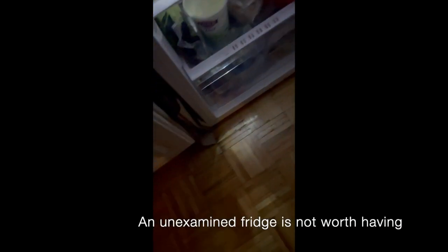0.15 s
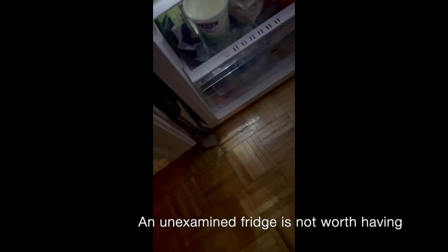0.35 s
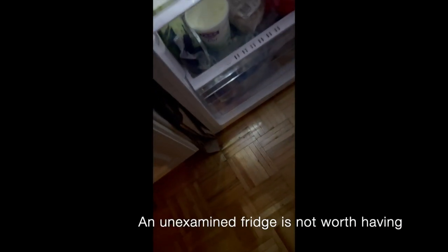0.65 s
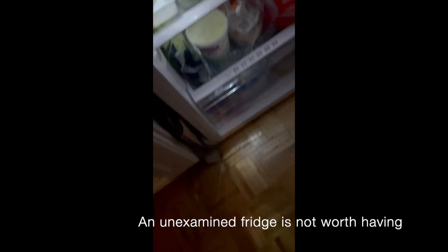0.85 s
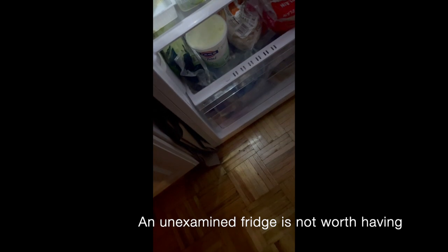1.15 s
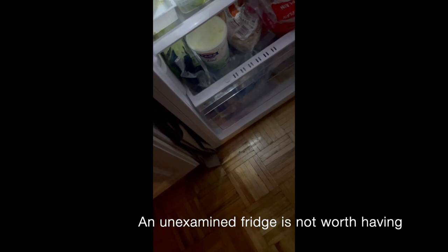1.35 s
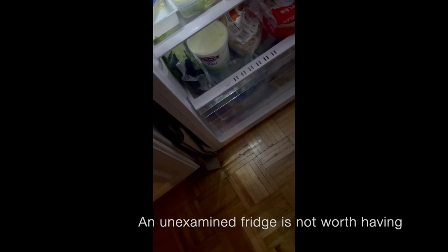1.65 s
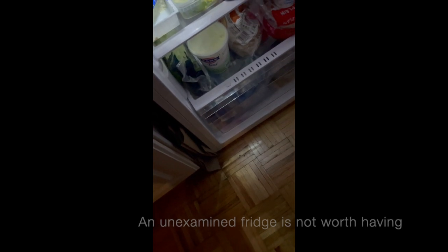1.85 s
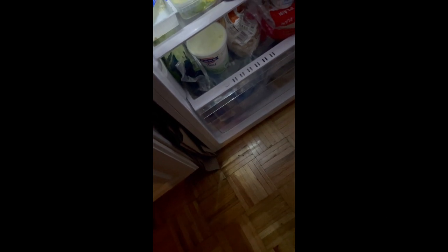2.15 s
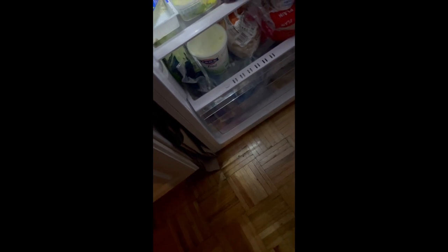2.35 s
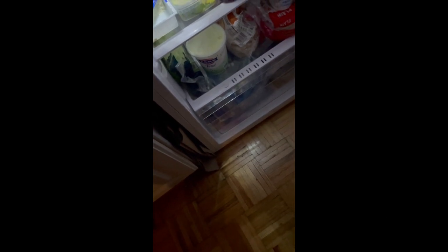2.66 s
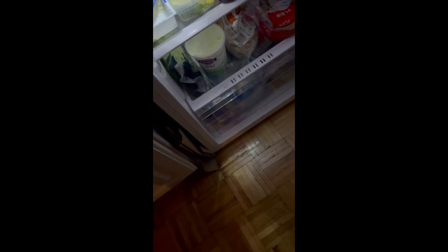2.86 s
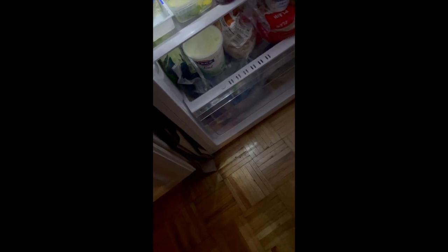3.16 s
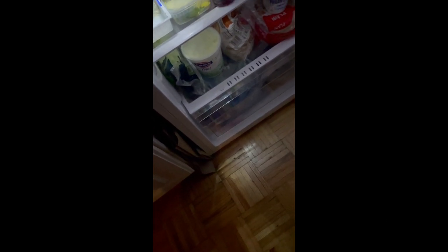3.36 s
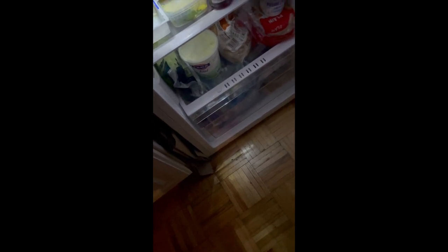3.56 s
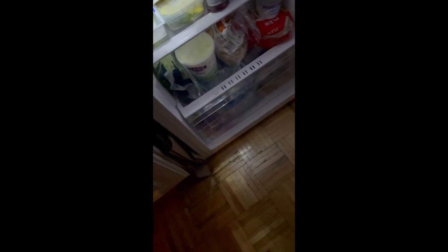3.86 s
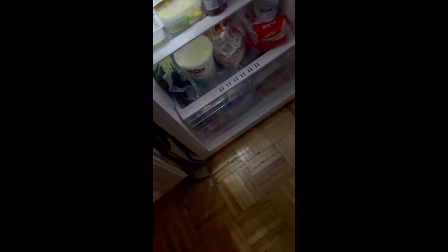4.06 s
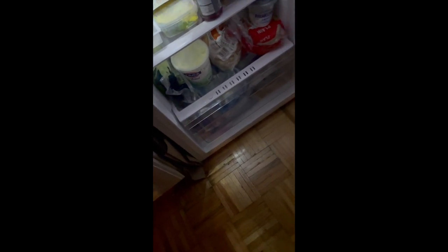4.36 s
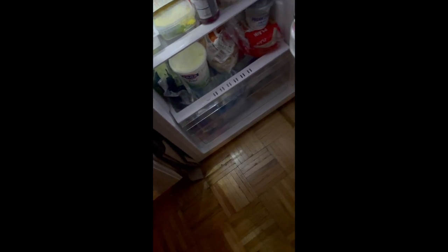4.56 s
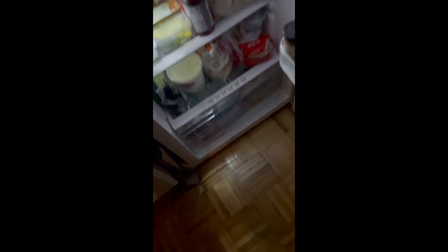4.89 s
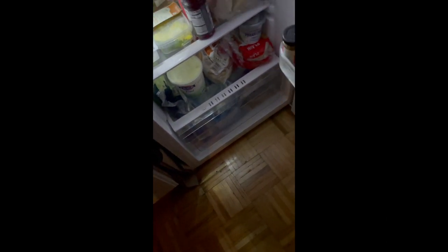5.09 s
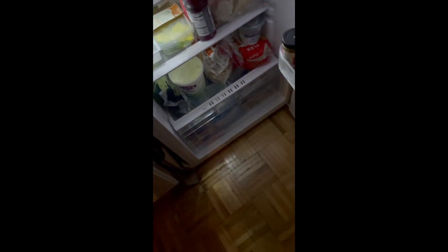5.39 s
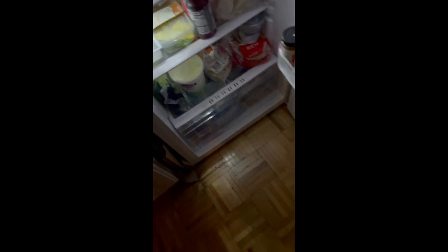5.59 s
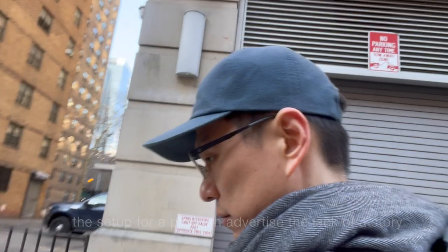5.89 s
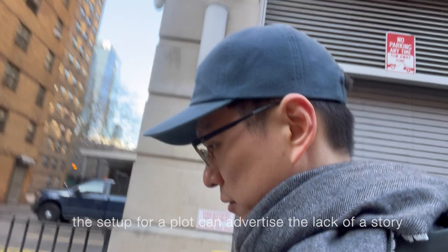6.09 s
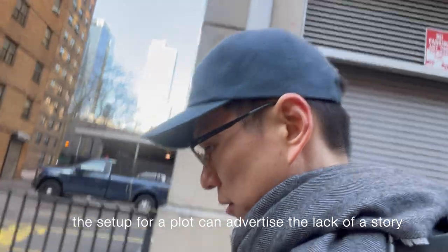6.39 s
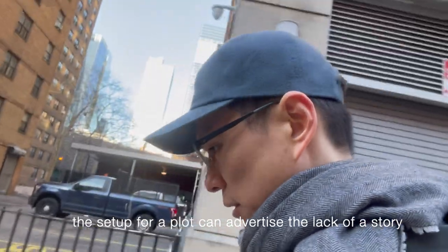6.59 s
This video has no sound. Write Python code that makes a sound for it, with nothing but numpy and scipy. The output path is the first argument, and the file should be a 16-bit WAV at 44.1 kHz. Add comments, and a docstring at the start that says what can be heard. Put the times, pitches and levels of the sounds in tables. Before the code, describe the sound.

A refrigerator runs in a quiet kitchen, heard from a hand-held microphone. From the start there is a steady low hum with a fluttering, higher buzz, a soft rush of air and a very faint hiss of gas in the pipes. Fingers rustle and rumble softly on the microphone in the first half second. The plastic liner ticks lightly now and then, most clearly at about 1.3 seconds. A soft, low knock comes at about 4.2 seconds, and the buzz shifts slightly in tone as the microphone moves. Two sharp taps hit the microphone at about 5.6 and 5.8 seconds. At about 5.9 seconds the sound cuts abruptly to a much louder street. Traffic roars widely, wind gusts buffet the microphone and ease off, clothing rustles faintly, and small metal pieces clink brightly close by until the end at about 6.5 seconds.

```python
"""A refrigerator hums and buzzes with its door open in a quiet kitchen. Its compressor shaft makes the hum,
and each piston stroke shakes the shell into a buzz. Cooling gas hisses in the pipes, the plastic liner
ticks, and a hand rustles and taps on the microphone. Near the end the scene cuts to a city pavement:
loud traffic, wind buffeting the microphone and small metal things clinking on someone walking."""
import sys
import numpy as np
from scipy import signal
from scipy.fft import rfft, irfft
from scipy.io import wavfile
from scipy.ndimage import uniform_filter1d

SR = 44100
rng = np.random.default_rng(int(sys.argv[2]) if len(sys.argv) > 2 else 0)


def materialize(psi):
    """Save the field psi as 16-bit PCM at rate SR to the path in sys.argv[1].

    A 1-D psi becomes a single channel; in a 2-D psi each row is a channel.
    """
    bounded = np.clip(np.atleast_2d(psi).T, -1, 1)
    quanta = np.round(bounded * 32767).astype(np.int16)
    wavfile.write(sys.argv[1], SR, quanta)


N = 296969
TIME = np.arange(N) / SR
FREQ = np.maximum(np.arange(N // 2 + 1) * SR / N, 1)
SHAFT_HZ = 59.4094  # turns of the compressor each second
CUT_S = 5.856  # the kitchen gives way to the street


def undb(db):
    """Turn decibels into a gain."""
    return 10 ** (np.asarray(db) / 20)


def unit(x):
    """Scale a sound to an average (rms) level of 1."""
    return x / np.sqrt(np.mean(x ** 2))


def shape(points):
    """A gain for every frequency, drawn through (pitch_hz, level_db) points."""
    hz, db = np.transpose(points)
    return undb(np.interp(np.log(FREQ), np.log(np.maximum(hz, 1)), db))


def drift(rate_hz):
    """A smooth random wobble, about 1 in size."""
    hold = int(SR / rate_hz)
    steps = np.repeat(rng.standard_normal(N // hold + 1), hold)
    return 1.3 * uniform_filter1d(uniform_filter1d(steps, hold), hold)[:N]


def swell(middle_s, half_length_s, db):
    """A bell-shaped rise and fall in level."""
    return undb(db) * np.exp(-((TIME - middle_s) / half_length_s) ** 2)


def noise(gain):
    """Noise with the given tone colour, at level 1."""
    return unit(irfft(rfft(rng.standard_normal(N)) * gain, N))


def stereo_noise(gain, side_gain, lag_ms=0, direct=0):
    """Mid is what both ears share, side is how they differ; the direct share arrives on the left first."""
    mid, diffuse = rfft(rng.standard_normal((2, N))) * gain
    lead = direct * np.sin(2 * np.pi * FREQ * lag_ms / 1000)
    side = irfft(side_gain * (1j * lead * mid + np.sqrt(1 - lead ** 2) * diffuse), N)
    mid = irfft(mid, N)
    return np.array([mid + side, mid - side]) / mid.std()


def pan(db):
    """Two gains that make the left louder than the right by db."""
    return undb(np.array([[db], [-db]]) / 2)


def add(out, start_s, sound):
    """Mix a short stereo sound into out."""
    i = int(start_s * SR)
    out[:, i:i + sound.shape[-1]] += sound[..., :N - i]


def strike(modes, tilt_db, contact_s):
    """A small hit with peak 1: a rough contact rings an object's notes, each fading 60 dB in ring_s."""
    t = TIME[:SR // 8]
    ring = 0
    for hz, ring_s, db in modes:
        angle = 2 * np.pi * hz * (1 + 0.012 * rng.standard_normal()) * t
        ring = ring + undb(db + tilt_db * np.log2(hz / 3000) - 60 * t / ring_s) * np.sin(angle)
    contact = 0.27 * rng.standard_normal((2, len(t))) * np.exp(-t / contact_s)
    contact[:, 0] += 1
    out = signal.fftconvolve(contact, ring[None], axes=1)
    return out / np.abs(out).max()


def bump(middle_s, db, hz, half_length_s, phase=0):
    """A soft push on the microphone, a few cycles long."""
    return swell(middle_s, half_length_s, db) * np.sin(2 * np.pi * (phase - hz * (TIME - middle_s)))


def echo(x, wet_db, ring_s):
    """Hard walls add a short wash of echoes without the top treble."""
    t = TIME[:SR // 2]
    tail = rng.standard_normal((2, len(t))) * undb(-60 * t / ring_s) * (t > .003)
    tail = signal.sosfilt(signal.butter(2, 7000, fs=SR, output="sos"), tail)
    tail /= np.sqrt(np.sum(tail ** 2, axis=1, keepdims=True))
    return x + undb(wet_db) * signal.fftconvolve(x, tail, axes=1)[:, :N]


def nearest_turn(delay_ms):
    """For an event that comes once a shaft turn: the nearest turn's number, and ms from its event."""
    turns = SHAFT_HZ * (TIME - delay_ms / 1000)
    nearest = np.round(turns)
    return nearest.astype(int) + 1, (turns - nearest) * 1000 / SHAFT_HZ


# Tone colour of the traffic: pitch_hz, relative_db
TRAFFIC_COLOUR = [(18, -44), (30, -15), (46, -0.5), (85, 1), (227, -10), (306, -7), (401, -13), (454, -10),
                  (501, -13), (745, -7), (1160, -16.5), (2500, -23), (5930, -41), (8810, -41),
                  (11000, -48.5), (14300, -78), (22000, -120)]
# How wide the traffic sounds: pitch_hz, side_minus_mid_db
TRAFFIC_WIDTH = [(60, 0), (110, 0.5), (200, 4), (380, 3), (700, 4.5), (1290, 9.5), (2380, -1.5),
                 (4400, 0.5), (8120, -5.5), (15000, 26)]
def traffic(since_cut_s, level_db=-40, fade_db_per_s=1.5):
    """Traffic roars between house fronts and slowly draws away."""
    roar = stereo_noise(shape(TRAFFIC_COLOUR), shape(TRAFFIC_WIDTH), lag_ms=0.3, direct=0.55)
    return roar * undb(level_db - fade_db_per_s * since_cut_s + 0.92 * drift(25))


def clothing():
    """Cloth rustles in small, bright grains."""
    colour = shape([(3000, -30), (6500, -10), (9000, 7.5), (12000, -15), (15000, 2.5)])
    return stereo_noise(colour, undb(-12)) * undb(-66 + 2 * drift(35))


# Tone colour of the breeze: pitch_hz, relative_db
WIND_COLOUR = [(25, -23), (55, -10), (85, -11.5), (135, 3), (190, -7), (250, -7.5), (400, -20.5),
               (800, -18.5), (2000, -71)]
# Gusts that throw swirls of air: start_s, length_s, typical_peak_db, typical_pitch_hz
GUSTS = [(5.864, .12, -27, 145), (5.995, .035, -29.5, 380), (6.191, 0.031, -30.5, 440),
         (6.269, .03, -34, 340), (6.33, .03, -37, 63.6)]
def wind(since_cut_s, level_db=-33.5, fade_db_per_s=19, swirls=5, half_length_cycles=1.15):
    """A dying breeze and its gusts hit one side of the microphone; small swirls are short and high."""
    out = noise(shape(WIND_COLOUR)) * undb(level_db - fade_db_per_s * since_cut_s + 3.9 * drift(40))
    for start_s, length_s, db, hz in GUSTS:
        times = start_s + length_s * (np.arange(swirls) + rng.random(swirls) - .5) / (swirls - 1)
        for middle_s, (pitch, size, phase) in zip(times, rng.standard_normal((swirls, 3))):
            swirl_hz = hz * np.exp(0.17 * pitch)
            out += bump(middle_s, db + 2.5 * size, swirl_hz, half_length_cycles / swirl_hz, phase)
    return out


# Notes of a small piece of metal: pitch_hz, ring_s, relative_db
METAL_NOTES = [(7970, 0.011, -4), (9020, 0.017, -4), (10060, 0.0046, -0.5), (12450, .006, -4),
               (14330, 0.028, -10), (15140, 0.022, -4), (15200, 0.018, -2.5)]
# Each clink: start_s, relative_db
CLINKS = [(5.882, -49), (5.950, -52.5), (6.257, -40), (6.263, -50), (6.306, -49), (6.3752, -52),
          (6.393, -48), (6.466, -45.5)]
def clinks(boost_db=7.5):
    """Small metal, such as a zip pull, knocks and rings on someone walking."""
    out = np.zeros((2, N))
    for start_s, db in CLINKS:
        add(out, start_s, undb(db + boost_db) * strike(METAL_NOTES, 0, contact_s=0.0034))
    return out


def street():
    """Traffic, separate wind on the left and right, and a walker close by."""
    since_cut_s = np.maximum(TIME - CUT_S, 0)
    roar = traffic(since_cut_s)
    buffeting = np.array([wind(since_cut_s), wind(since_cut_s)]) * pan(-0.9)
    return roar + buffeting + clothing() + clinks()


# Tone colour of the kitchen air: pitch_hz, relative_db
AIR_COLOUR = [(20, -27), (45, -5), (75, -0.5), (150, -12), (200, -3), (300, -9.5), (420, -20), (600, -28),
              (1000, -26.5), (1250, -23), (2400, -28), (3200, -44), (6000, -55), (12000, -72)]
# How wide noise sounds in the kitchen: pitch_hz, side_minus_mid_db
ROOM_WIDTH = [(60, -17), (200, -21), (380, -7), (700, 3.5), (1300, -3.5), (4400, 0), (12000, 10)]
def room_air():
    """Air and a fan make a soft, low rush."""
    return undb(-58.5 + drift(5)) * stereo_noise(shape(AIR_COLOUR), shape(ROOM_WIDTH))


# Notes of the microphone's case: pitch_hz, ring_s, relative_db
CASE_NOTES = [(760, 0.021, -1.5), (1140, 0.0088, -13), (1710, .008, 2), (2650, 0.0047, 4.5),
              (3900, .005, -1), (5100, 0.005, -2), (7800, 0.0016, -21), (14800, 0.0018, -3)]
# Each tap: start_s, peak_db, brightness_db_per_octave
TAPS = [(5.6481, -34, -0.5), (5.844, -29, -7)]
def taps():
    """Sharp taps make the microphone's case ring briefly."""
    out = np.zeros((2, N))
    for start_s, db, tilt_db in TAPS:
        add(out, start_s, undb(db) * strike(CASE_NOTES, tilt_db, contact_s=0.00053))
    return out


# Tone colour of rubbing fingers: pitch_hz, relative_db
GRIP_COLOUR = [(20, -11), (50, 6.5), (100, -17.5), (250, -22), (700, -17.5), (2000, -31), (3800, -30.5),
               (8000, -50), (11000, -64.5)]
# Presses of the palm: middle_s, half_length_s, level_db
PRESSES = [(0.222, 0.088, -49.5), (4.28, 0.053, -54)]
# Tone colour of their rumble: pitch_hz, relative_db
PRESS_COLOUR = [(20, -16), (45, 5.5), (65, 7.5), (110, -16), (400, -61.5), (2000, -110)]
def handling(grip_db=-62, fade_db_per_s=20):
    """A hand holds the microphone: fingers rustle and settle, the palm rumbles, the case is knocked."""
    clicks = taps()
    grip = undb(grip_db - fade_db_per_s * TIME + 2 * drift(40))
    rustle = grip * stereo_noise(shape(GRIP_COLOUR), shape(ROOM_WIDTH))
    rumble = sum(swell(*press) for press in PRESSES) * noise(shape(PRESS_COLOUR))
    knock = bump(middle_s=4.158, db=-36, hz=71, half_length_s=0.0085)
    return echo(clicks, wet_db=-9, ring_s=0.25) + rustle + rumble + knock


# Each whistle: middle_s, half_length_s, pitch_hz, level_db
WHISTLES = [(.63, .11, 4560, -88), (5.0, .7, 4620, -93)]
def whistles(half_width_hz=45):
    """Gas whistles thinly in a narrow pipe: a slim band of hiss swells and fades."""
    return sum(swell(middle_s, half_length_s, db) * noise(1 / (1 + ((FREQ - hz) / half_width_hz) ** 4))
               for middle_s, half_length_s, hz, db in WHISTLES)


# Puffs from the valves in one shaft turn: delay_ms, half_length_ms, relative_db
VALVE_PUFFS = [(0, 0.93, 8.5), (2, 1.8, -3), (7.6, 1.4, -2.5), (10.4, .8, -8.5)]
# Pitches at which the pipes ring: pitch_hz, half_width_hz, relative_db
PIPE_NOTES = [(2780, 82, -1.5), (3350, 63, -5.5), (3530, 110, 3), (3900, 74, 3.5), (4570, 220, 0),
              (4840, 170, 2), (5800, 200, -9.5), (7500, 1200, -25.5)]
def gas_hiss(level_db=-85.5, steady_db=-2.5):
    """Cooling gas hisses through the pipes, with a puff each time a valve opens."""
    puffs = sum(undb(db) * np.exp(-(nearest_turn(delay_ms)[1] / half_length_ms) ** 2)
                for delay_ms, half_length_ms, db in VALVE_PUFFS)
    flow = (undb(steady_db) + puffs) * stereo_noise(1, undb(-5.5))
    pipe_power = sum(undb(db) ** 2 / (1 + ((FREQ - hz) / width) ** 2) ** 2
                     for hz, width, db in PIPE_NOTES)
    return undb(level_db) * unit(irfft(rfft(flow) * np.sqrt(pipe_power), N))


# Notes of the plastic liner: pitch_hz, ring_s, relative_db
LINER_NOTES = [(500, .03, -16), (890, 0.062, -7.5), (1500, 0.016, -9), (2970, 0.023, 0), (3310, .018, 2),
               (3820, 0.0051, -2), (4400, 0.0072, -2), (5100, 0.0041, -1.5), (6200, .008, -13.5),
               (8550, .006, -24)]
# Each tick: start_s, relative_db, brightness_db_per_octave
TICKS = [(.489, -71, 1), (.509, -61, -4), (.560, -60, 3), (1.2532, -49.5, -2.5), (2.222, -72, 8),
         (2.835, -71, 3.5), (3.703, -68, 10), (4.294, -65, 5), (4.365, -68.5, 7.5), (4.8305, -67, 2)]
def liner_ticks(boost_db=7.5):
    """The cabinet's plastic liner ticks now and then."""
    out = np.zeros((2, N))
    for start_s, db, tilt_db in TICKS:
        add(out, start_s, undb(db + boost_db) * strike(LINER_NOTES, tilt_db, contact_s=0.003))
    softened = signal.sosfilt(signal.butter(4, 9000, fs=SR, output="sos"), out)
    return echo(softened, wet_db=-8, ring_s=0.17)


# Pitches that the cabinet swallows: pitch_hz, half_width_hz, change_db
CABINET_DIPS = [(1032, 22, -5.5), (1223, 61, -3), (1597, 50, -8.5), (2190, 25, -10), (2763, 90, -6)]
def through_cabinet(x):
    """Reflections inside the cabinet cancel a few narrow bands."""
    dips_db = sum(db * np.exp(-((FREQ - hz) / width) ** 2) for hz, width, db in CABINET_DIPS)
    return irfft(rfft(x) * undb(dips_db), N)


# Ways the pump rocks: rate_hz, timing_swing_ms, strength_swing_db
ROCKING = [(18, .046, 1.2), (10.5, .022, .6), (24, .014, .5)]
def pump_rocking(stroke_count, wander=0.077):
    """The pump rocks on its springs, which changes the timing and strength of each stroke."""
    stroke_s = np.arange(stroke_count) / SHAFT_HZ
    early_ms, strength_db = 0, 0
    for hz, swing_ms, swing_db in ROCKING:
        sway = np.sin(2 * np.pi * hz * stroke_s + wander * np.cumsum(rng.standard_normal(stroke_count)))
        early_ms = early_ms + swing_ms * sway
        strength_db = strength_db + swing_db * sway
    return early_ms, strength_db


# Bursts of the shell in one turn: delay_ms, base_pitch_hz, half_length_ms, base_db, left_minus_right_db
SHELL_BURSTS = [(3.01, 1199, 2.12, -53.5, 5), (7.5, 1212, 1.92, -50.5, -10.5), (10, 1460, 1.65, -62.5, -3),
                (15, 1138, 2.08, -60.5, -7), (3.19, 1837, 1.13, -58, -0.5), (11.15, 1930, 1.8, -70, 2.5),
                (4.7, 2424, 1.78, -61, 10.5), (9.2, 2490, 4.8, -63.5, -4), (0.81, 4950, 1, -78.5, 0),
                (1.1, 4600, 0.79, -81, -2), (1.3, 3920, 1.2, -82.5, -4), (2.6, 3500, 1.5, -79.5, -1.5),
                (12, 2600, 2.5, -74, 1)]
def shell_buzz(band_db, delay_scale, high_shift_hz, jitter_ms=0.013, scatter_db=0.5):
    """Each piston stroke sends short bursts through the shell; the rocking pump makes them flutter."""
    bands_hz = np.array([1200, 1850, 2480])  # low, middle and high buzz
    stroke_count = int(SHAFT_HZ * N / SR) + 4
    early_ms, strength_db = pump_rocking(stroke_count)
    out = 0
    for row, (delay_ms, hz, half_length_ms, db, pan_db) in enumerate(SHELL_BURSTS):
        turn, ms = nearest_turn(delay_ms * delay_scale)
        jitter, scatter = rng.standard_normal((stroke_count, 2)).T
        ms = ms + (early_ms + jitter_ms * jitter)[turn]
        # rocking loads one side of the shell while it relieves the other
        stroke_db = (-1) ** row * strength_db + scatter_db * scatter
        band = np.argmin(np.abs(bands_hz - hz))
        ring_hz = hz + high_shift_hz * (band == 2)
        burst = np.exp(-(ms / half_length_ms) ** 2) * np.cos(2 * np.pi * ring_hz * ms / 1000)
        out = out + burst * undb(db + band_db[band] + stroke_db[turn]) * pan(pan_db)
    return out


# Tones of the hum: multiple_of_shaft_rate, base_db, waver_db
HUM_TONES = [(1, -48.5, 0.26), (2, -59, 1.5), (3, -66.5, 2), (4, -77.5, 3.5), (6, -71.5, 5), (8, -71, 2),
             (12, -83, 4.5), (13, -84, 4), (14, -82.5, 3), (15, -87.5, 7.5), (16, -97.5, 5)]
def compressor_hum(low_db, upper_db, panel_db, upper_from=12, panel_multiple=7):
    """The shaft hums at multiples of its turning rate; one matches a panel's own note and sings."""
    angle = 2 * np.pi * SHAFT_HZ * TIME
    tones = 0
    for multiple, db, waver_db in HUM_TONES:
        place_db = upper_db if multiple >= upper_from else low_db
        tones = tones + undb(db + place_db + waver_db * drift(9)) * np.cos(multiple * (angle - 2))
    panel = undb(panel_db + 0.33 * drift(12)) * np.cos(panel_multiple * angle)
    return tones * pan(0.082) + panel * pan(-3.5)


# What each move of the microphone changes: start_s, length_s, low_hum_db, upper_hum_db, panel_db,
# low_buzz_db, middle_buzz_db, high_buzz_db, burst_delay_percent, high_buzz_shift_hz
MOVES = [(0, 0.92, 0, -1.5, 0.6, 1.4, 6.2, -1, -0.5, -92.5),
         (3.696, 1.2, -1.5, 4, -2, 1.3, 2.5, -3.2, -2, 100),
         (5.477, 0.29, -3.5, -1, -3, 0.4, -2.5, 2, 0, 0)]
def microphone_moves():
    """The hand eases through the room's loud and quiet spots (standing waves); one curve per change."""
    total = 0
    for start_s, length_s, *changes in MOVES:
        progress = np.clip((TIME - start_s) / length_s, 0, 1)
        total = total + np.outer(changes, (1 - np.cos(np.pi * progress)) / 2)
    return total


def fridge(start_panel_db=-54, start_buzz_db=(-1.56, -7, -0.5), start_shift_hz=105):
    """The running refrigerator in its kitchen, heard from a moving, hand-held microphone."""
    low_db, upper_db, panel_db, *buzz_db, delay_percent, shift_hz = microphone_moves()
    band_db = [start + change for start, change in zip(start_buzz_db, buzz_db)]
    buzz = shell_buzz(band_db, 1 + delay_percent / 100, start_shift_hz + shift_hz)
    buzz_and_air = through_cabinet(echo(buzz, wet_db=-18.5, ring_s=0.52) + room_air())
    hiss = gas_hiss()
    hum = compressor_hum(low_db, upper_db, start_panel_db + panel_db)
    return hum + buzz_and_air + hiss + whistles() + liner_ticks() + handling()


def scene():
    """The kitchen, then a hard cut to the street."""
    outdoors = np.clip((TIME - CUT_S) / .004, 0, 1)
    return (1 - outdoors) * fridge() + outdoors * street()


def record(dry, bottom_hz=25, top_hz=15900):
    """The microphone drops the deepest rumble and the highest treble."""
    sound = signal.sosfilt(signal.butter(2, bottom_hz, "high", fs=SR, output="sos"), dry)
    return signal.sosfilt(signal.ellip(8, .2, 70, top_hz, fs=SR, output="sos"), sound)


dry = scene()
out = record(dry)
materialize(out)
```